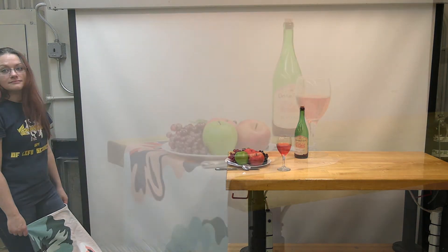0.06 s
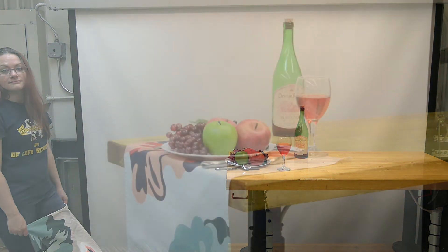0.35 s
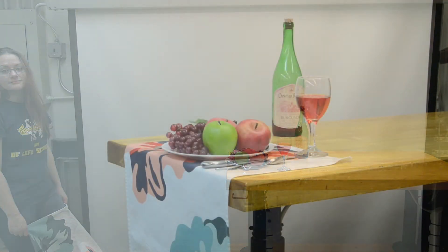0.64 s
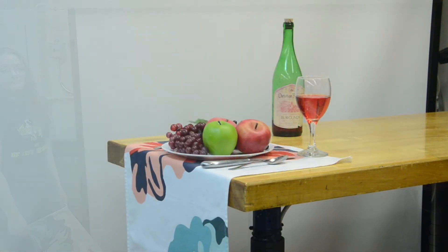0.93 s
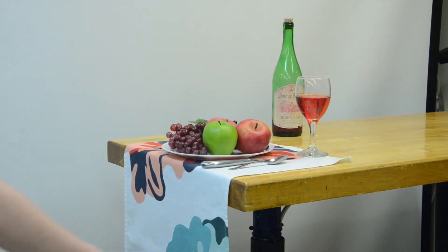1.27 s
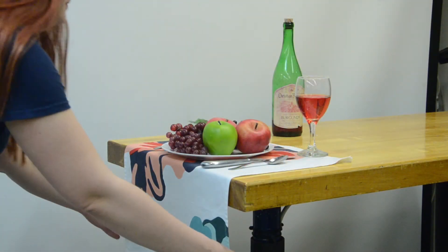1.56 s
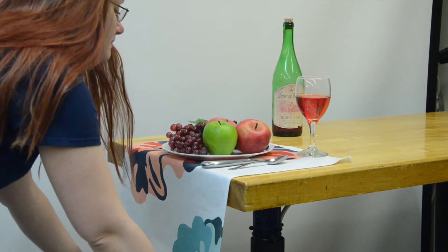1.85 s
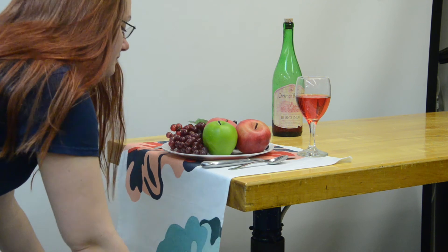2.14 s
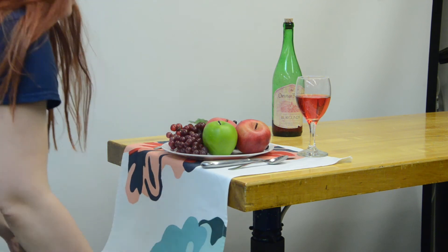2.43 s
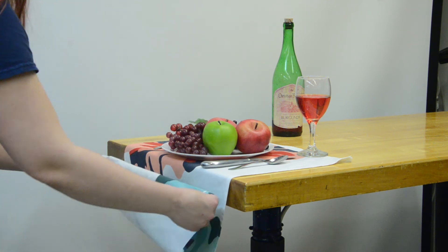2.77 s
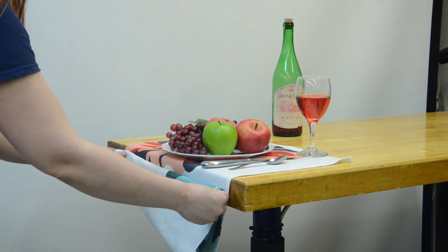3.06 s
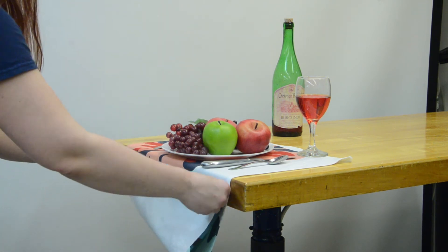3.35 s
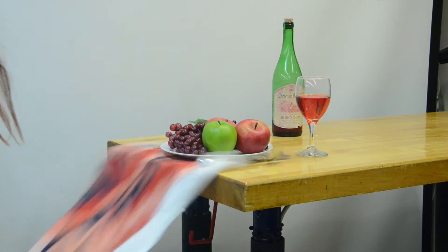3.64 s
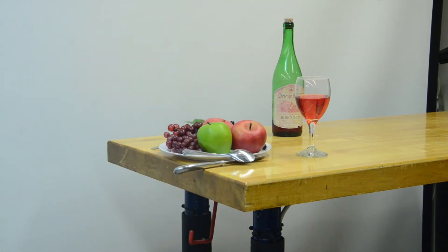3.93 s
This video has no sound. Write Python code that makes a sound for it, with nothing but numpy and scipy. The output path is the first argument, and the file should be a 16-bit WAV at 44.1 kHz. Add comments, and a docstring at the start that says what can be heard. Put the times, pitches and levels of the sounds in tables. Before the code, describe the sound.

A tablecloth cracks tight and slides away, briefly overloading the microphone, as dishes land on wood and a fork and spoon clatter and ring. Before that, only fans hum quietly in the slightly echoing room.

```python
"""In a hard-walled room, a cloth is whipped from under the dishes and cutlery on a wooden table. Fans hum; the
background is louder for the first moment and drops at 0.43 s, and a few faint ticks come before the pull. Near
the end the cloth snaps tight, so loudly that it overloads the microphone, and slides away. The dishes drop back
and knock on the wood, the plate rings, and a fork and a spoon bounce and chime."""
import sys
import numpy as np
from scipy import signal
from scipy.fft import rfft, irfft
from scipy.io import wavfile
from scipy.ndimage import uniform_filter1d

SR = 44100
rng = np.random.default_rng(int(sys.argv[2]) if len(sys.argv) > 2 else 0)


def dump_mix(stems):
    """Bounce the given channels to the path in sys.argv[1] as a 16-bit WAV at rate SR."""
    frames = np.atleast_2d(stems).T  # one column per channel
    limited = np.clip(frames, -1, 1)  # hard clip at full scale
    pcm = np.round(limited * 32767).astype(np.int16)
    wavfile.write(sys.argv[1], SR, pcm)


N = 176400
T = np.arange(N) / SR
HZ = np.fft.rfftfreq(N, 1 / SR)


# The tone colour of the moving cloth. Each row: frequency in Hz, relative level in dB.
CLOTH_COLOUR = [(30, -40), (70, -15), (280, -9), (420, -5.5), (700, -3.5), (2400, -1), (3500, -7),
                (6000, -13), (10000, -17.5), (15000, -67)]

def cloth(snap_s=3.6675, swish_db_per_s=1014, swish_top_hz=700, slide_top_hz=5000):
    """A dull swish swells, the cloth cracks tight, then it slides out from under the dishes."""
    colour = amp(read(CLOTH_COLOUR, HZ))
    swell = amp(-30.5 - swish_db_per_s * abs(T - snap_s))
    swish = swell * noise(colour / np.hypot(1, HZ / swish_top_hz))
    snap = amp(-3) * burst(snap_s, fade_s=0.021, hold_s=0.0074) * noise(colour)
    crack = amp(-11) * burst(snap_s, fade_s=0.008) * noise(band(6500, octaves=0.85))
    slide = amp(-16.5) * burst(snap_s, fade_s=0.53) * noise(colour / np.hypot(1, HZ / slide_top_hz))
    return crack + in_room(swish + snap + slide, echo_db=-3)


# The dishes landing. Each row: start in seconds, level in dB.
LANDINGS = [(3.666, -14.5), (3.685, -17.5), (3.699, -16), (3.715, -14.5), (3.736, -27), (3.764, -30),
            (3.806, -30.5), (3.857, -28.5)]
# The tone colour of a knock on the table. Each row: frequency in Hz, relative level in dB.
WOOD_COLOUR = [(30, -45), (90, -15), (160, -8), (280, 0), (400, -7), (620, -3), (1500, -9.5), (3000, -8),
               (10000, -33)]
# The notes of the plate and table. The lists give: pitch in Hz, level in dB, fade time in seconds.
PLATE_HZ = [156, 271, 580, 797, 985, 1114, 1229, 1292, 1459, 1518, 1922, 2190]
PLATE_DB = [-16.5, -10, -10.5, -18.5, -20, -25, -35, -20, -16, -3, -18, -9]
PLATE_FADE_S = [0.16, 0.17, 0.21, 0.25, 1, 0.39, 0.24, 0.74, 0.89, 0.15, 0.21, 0.33]

def dishes():
    """A plate, a bottle and a glass knock on the table top, and the plate rings."""
    hits = sum(amp(db) * burst(start, fade_s=0.1, rise_s=0.0019) for start, db in LANDINGS)
    plate = ring(PLATE_HZ, PLATE_DB, PLATE_FADE_S, LANDINGS)
    knocks = hits * noise(amp(read(WOOD_COLOUR, HZ)))
    return in_room(knocks, echo_db=-6.5) + in_room(plate, echo_db=-2.5)


# The cutlery bouncing. Each row: start in seconds, then strength in dB of the clack, fork and spoon.
BOUNCES = [(3.727, -24, -7, -18), (3.746, -25, -3, -20), (3.7656, -14.5, 0, -12), (3.783, -19, -1, -14),
           (3.8, -20, -8, -14), (3.8564, -13, -13, -2), (3.868, -19, -17, 0), (3.886, -23, -17, -5),
           (3.92, -27, -10, -14), (3.951, -24, -3, -12)]
# The tone colour of metal hitting china and wood. Each row: frequency in Hz, relative level in dB.
CLACK_COLOUR = [(200, -43), (600, -13.5), (1400, 1), (2200, -1.5), (2700, 1.5), (3400, 0), (5000, 0),
                (5700, -13), (6400, -3), (7500, -4), (10300, -7.5), (12000, -20), (15000, -30)]
# The notes of the fork and the spoon. The lists give: pitch in Hz, level in dB, fade time in seconds.
FORK_HZ = [2586, 2938, 3972, 4738, 5110, 6280, 8128, 10014, 10218, 11445, 12828, 14690]
FORK_DB = [-22.5, -26, -28, -24, -23, -24, -29, -29, -32, -41, -47, -43]
FORK_FADE_S = [.6, .7, .75, .7, .8, .45, .6, .22, .35, .5, .2, .2]
SPOON_HZ = [3318, 4054, 4479, 4750, 6908, 7230, 8125, 8290, 8909, 10605, 11447, 13288]
SPOON_DB = [-21, -27, -26, -30, -33, -33, -27, -30, -26.5, -34, -39, -42]
SPOON_FADE_S = [.09, .45, .5, .6, .65, .12, .6, .55, .8, .22, .45, .2]

def cutlery():
    """Each bounce is a short clack that sets the fork and the spoon ringing."""
    hits = sum(amp(db + 3) * burst(start, fade_s=0.07, rise_s=0.00067) for start, db, _, _ in BOUNCES)
    clacks = hits * noise(amp(read(CLACK_COLOUR, HZ)))
    fork = ring(FORK_HZ, FORK_DB, FORK_FADE_S, [(start, db) for start, _, db, _ in BOUNCES])
    spoon = ring(SPOON_HZ, SPOON_DB, SPOON_FADE_S, [(start, db) for start, _, _, db in BOUNCES])
    return in_room(clacks, echo_db=-2.5) + in_room(fork + spoon, echo_db=-11)


# Faint ticks. Each row: start in seconds, level in dB, centre in Hz, width in octaves, fade in seconds.
TICKS = [(.718, -59, 4300, 0.16, 0.024), (3.576, -45, 3560, 1., 0.11)]

def handling(tick_top_hz=10700, glass_hz=4200, brush_s=0.645, brush_width_s=0.018):
    """Before the pull, fabric brushes softly and two ticks sound; the first leaves a glass ringing."""
    treble_cut = 1 / np.hypot(1, (HZ / tick_top_hz) ** 10)
    ticks = sum(amp(db) * burst(start, fade_s) * noise(treble_cut * band(hz, octaves))
                for start, db, hz, octaves, fade_s in TICKS)
    glass = amp(-79) * burst(0.718, fade_s=1.5) * np.sin(2 * np.pi * glass_hz * T)
    swell = np.exp(-0.5 * ((T - brush_s) / brush_width_s) ** 2)
    brush = amp(-73) * swell * noise(band(8200, octaves=0.17))
    return in_room(ticks, echo_db=-3.5) + glass + brush


# The tone colours of the steady air and of the louder background heard for the first 0.43 s. Each row:
# frequency in Hz, relative level in dB.
AIR_COLOUR = [(25, -9), (62, -5.5), (95, -13), (175, -9.5), (290, -10.5), (360, -14), (480, -8.5),
              (650, -14.5), (820, -13), (1100, -17.5), (2300, -22.5), (3600, -24.5), (5000, -29.5),
              (7200, -31.5), (9000, -40), (15000, -57)]
OPENING_COLOUR = [(25, -29), (70, -5), (150, 5), (330, 3.5), (500, 1), (800, -3.5), (1500, -10), (3000, -17),
                  (7000, -27), (9000, -47), (15000, -64)]
# The hum of the fans. Each row: pitch in Hz, level in dB after the background drops at 0.43 s.
FAN_TONES = [(495, -74), (592.3, -74), (1238, -86), (1472, -86), (1734, -86), (2972, -88), (3617, -89),
             (7155, -91), (10734, -97)]

def fans(opening_end_s=0.435, opening_hum_db=9, pair_hz=711.3, throb_every_s=0.546):
    """Fans push air and hum with a slight waver; for the first 0.43 s the air and hum are louder, then the
    background drops."""
    opening = np.clip((opening_end_s - T) / 0.0061, 0, 1)
    air = amp(-62 + 1.5 * noise(HZ < 3)) * noise(amp(read(AIR_COLOUR, HZ)))
    opening_air = opening * amp(-55) * noise(amp(read(OPENING_COLOUR, HZ)))
    hum = sum(amp(db) * np.sqrt(2) * np.cos(2 * np.pi * hz * T + 0.43 * noise(HZ < 4))
              for hz, db in FAN_TONES)
    # Two fans at nearly the same speed drift in and out of step, so their tone throbs.
    peak_s = np.where(T < opening_end_s, 0.06, 0.885)
    throb = 1 + 0.72 * np.exp(2j * np.pi * (T - peak_s) / throb_every_s)
    pair = amp(-69) * np.sqrt(2) * (throb * np.exp(2j * np.pi * pair_hz * T)).real
    return air + opening_air + (hum + pair) * amp(opening_hum_db * opening)


# How long the room echoes. Each row: frequency in Hz, seconds to fade by 60 dB.
ROOM_FADE = [(60, 0.12), (200, 0.27), (600, 0.82), (2000, 0.75), (5000, 0.97), (12000, 0.41)]

def in_room(sound, echo_db, gap_s=0.0015, build_s=0.011):
    """Hard walls add a wash of echoes in which each frequency dies away at its own speed."""
    hz, t, hiss = signal.stft(rng.standard_normal(SR), SR, nperseg=256)
    fade = np.exp(-np.log(1000) * t / read(ROOM_FADE, hz)[:, None])
    tail = signal.istft(hiss * fade, SR)[1][:SR]
    tail *= np.clip((T[:SR] - gap_s) / build_s, 0, 1)
    return sound + amp(echo_db) * signal.fftconvolve(sound, tail / np.linalg.norm(tail))[:N]


def ring(pitches, levels, fades, strikes, scatter_db=1):
    """A struck object rings with several notes; each strike feeds them a little differently."""
    out = np.zeros(N)
    first = round(min(start for start, _ in strikes) * SR)
    t = T[first:]
    for hz, db, fade_s in zip(pitches, levels, fades):
        motion = np.zeros(len(t), complex)
        for start, strength_db in strikes:
            at = round(start * SR) - first
            phase = np.angle(motion[at] + 1e-12 * np.exp(2j * np.pi * rng.random()))
            phase += rng.choice([-1, 1]) * np.pi / 2  # a quarter turn apart, so the energies add
            size = amp(db + strength_db + scatter_db * rng.standard_normal())
            fade = np.exp(-np.log(1000) * T[:len(t) - at] / fade_s)
            motion[at:] += size * np.exp(1j * phase) * fade
        softened = uniform_filter1d(motion, size=32)
        out[first:] += (softened * np.exp(2j * np.pi * hz * t)).real
    return out


def burst(start, fade_s, hold_s=0, rise_s=0.00042):
    """The loudness of one hit: it rises quickly, may hold, then drops by 60 dB in fade_s."""
    age = T - start
    rise = np.clip(age / rise_s, 0, 1)
    return rise * np.exp(-np.log(1000) * np.clip((age - hold_s) / fade_s, 0, 10))


def noise(colour):
    """Random noise with the given tone colour, scaled to a typical size of 1."""
    hiss = irfft(rfft(rng.standard_normal(N)) * colour, N)
    return hiss / (hiss.std() + 1e-20)


def band(hz, octaves):
    """A bell-shaped tone colour centred on one frequency."""
    return np.exp(-0.5 * (np.log2((HZ + 1) / hz) / octaves) ** 2)


def read(table, hz):
    """Looks up frequencies in a table, gliding between rows along a musical scale."""
    row_hz, values = np.transpose(table)
    return np.interp(np.log(hz + 1), np.log(row_hz + 1), values)


def amp(db):
    """Turns decibels into a number to multiply by."""
    return 10 ** (np.asarray(db) / 20)


def scene():
    """All the sounds meet at one microphone."""
    return (fans() + handling() + cloth() + dishes() + cutlery())[None]


# Narrow dips in the treble. Each row: centre in Hz, half the width in Hz, level at the centre in dB.
HOUSING_DIPS = [(5730, 130, -16), (6890, 50, -11)]

def record(dry, top_hz=15800):
    """The microphone's housing cuts two dips, the snap overloads it, and the highest treble is lost."""
    heard = dry
    for hz, half_width, db in HOUSING_DIPS:
        b, a = signal.iirnotch(hz, hz / (2 * half_width), SR)
        heard = amp(db) * heard + (1 - amp(db)) * signal.lfilter(b, a, heard)
    overloaded = np.clip(heard, -1, 1)
    treble_cut = signal.firwin(255, top_hz, window=("kaiser", 8), fs=SR)
    return signal.oaconvolve(overloaded, treble_cut[None], "same")


dry = scene()
out = record(dry)
dump_mix(out)
```